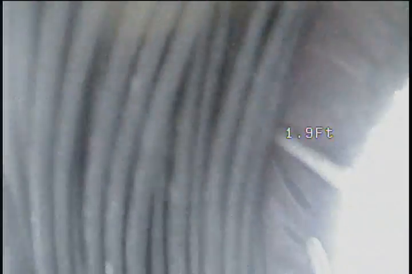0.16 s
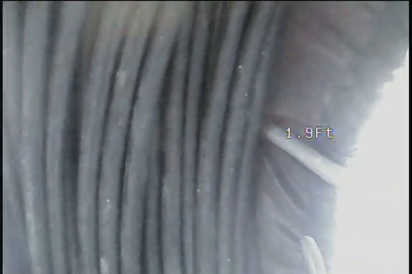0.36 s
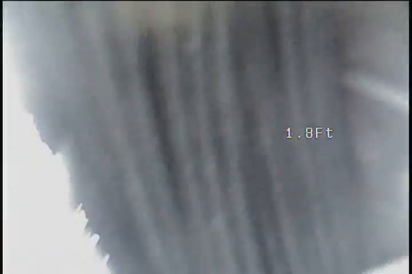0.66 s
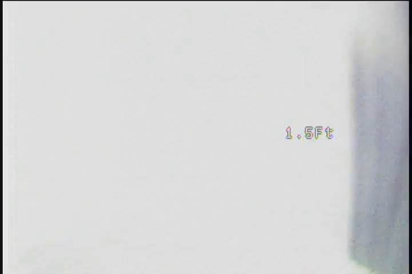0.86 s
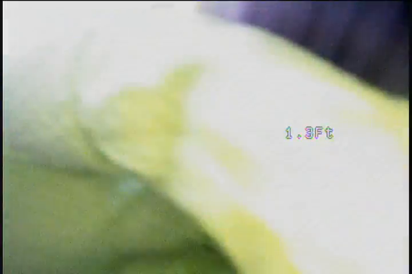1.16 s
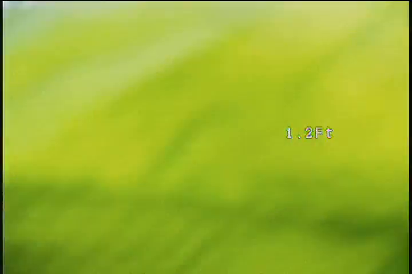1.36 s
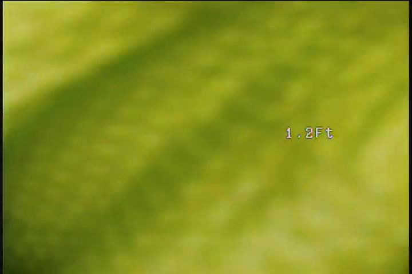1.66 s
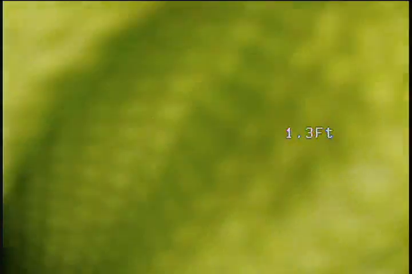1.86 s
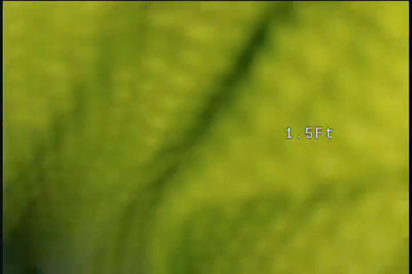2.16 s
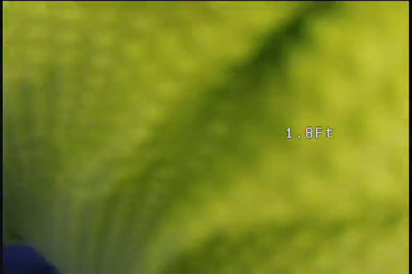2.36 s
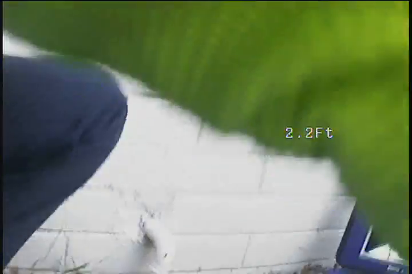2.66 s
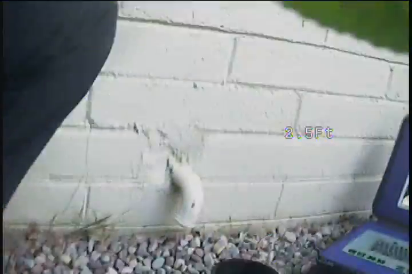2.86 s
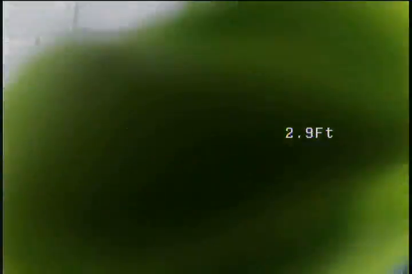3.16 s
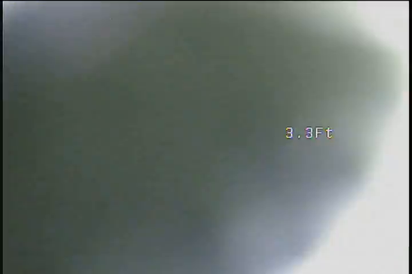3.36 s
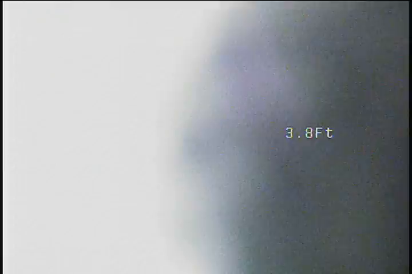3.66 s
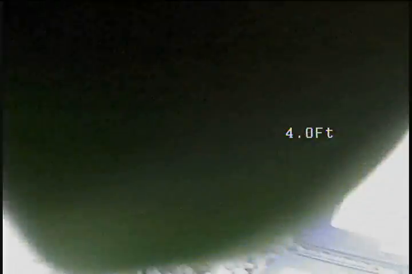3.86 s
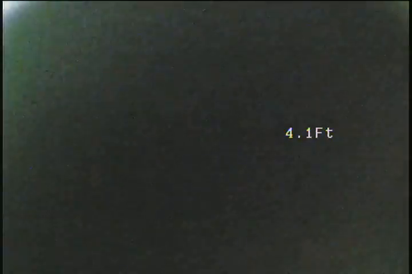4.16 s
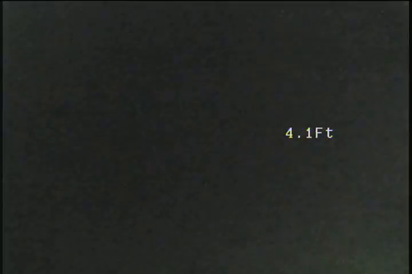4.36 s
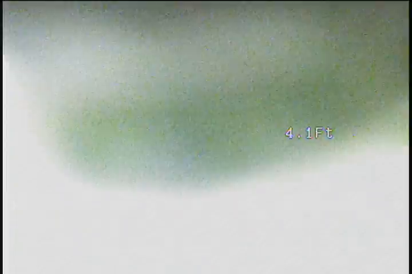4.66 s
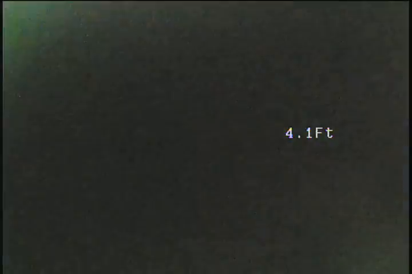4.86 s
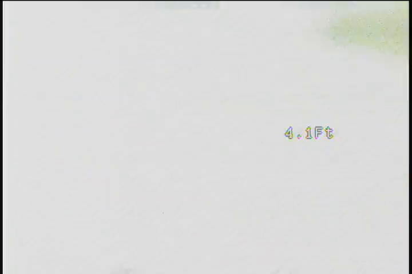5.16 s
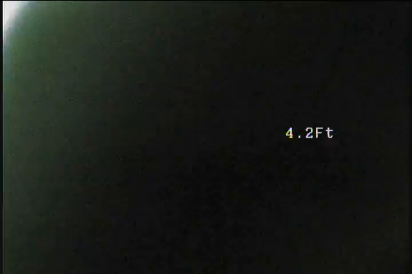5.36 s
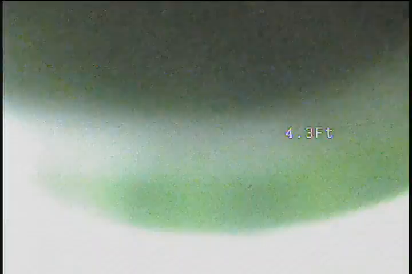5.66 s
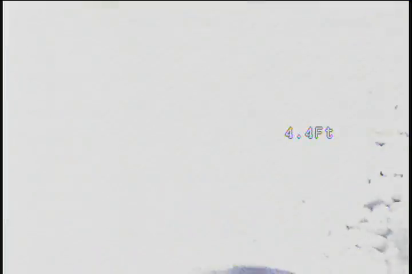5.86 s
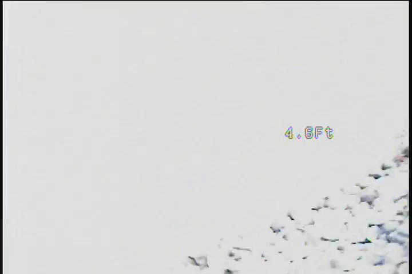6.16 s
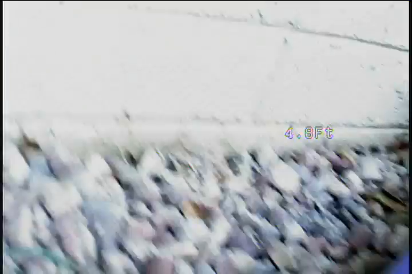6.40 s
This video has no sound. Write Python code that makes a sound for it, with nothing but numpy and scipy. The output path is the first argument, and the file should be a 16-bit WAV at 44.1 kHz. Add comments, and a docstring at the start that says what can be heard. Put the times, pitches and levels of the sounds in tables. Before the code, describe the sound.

A burst of metal clacks opens as cable coils knock a reel frame, one spoke ringing briefly. Isolated clicks follow with long near-quiet gaps, then gritty sliding and quickening rattles build to a loud clank. The sound turns to stony, scratchy rubbing of gloves and gravel along the cable, with crackles and small pebble ticks, fading to light scuffs. Dry, close outdoor pickup with steady low hiss and a barely audible high whine.

```python
"""Coils of a springy push cable knock and drag on a steel reel, outdoors; then gloves and gravel rasp on it.
Reel: noise bursts, clicks and gritty drag noise, heard dry and through the resonant modes of the frame.
Spokes: decaying sines. Rasp: grainy noise strokes, single cracks and short sine notes of pebbles.
Coloured hiss, a faint 15.7 kHz video line whine and an offset from zero lie underneath."""
import sys
import numpy as np
from scipy import signal
from scipy.fft import rfft, irfft, next_fast_len
from scipy.io import wavfile
from scipy.ndimage import uniform_filter1d

SR = 44100
rng = np.random.default_rng(int(sys.argv[2]) if len(sys.argv) > 2 else 0)


def dump(signal):
    """Clip the signal to [-1, 1] and save it as 16-bit WAV at the path in sys.argv[1]."""
    limited = np.clip(np.atleast_2d(signal).T, -1, 1)
    pcm = np.round(limited * 32767).astype(np.int16)
    wavfile.write(sys.argv[1], SR, pcm)


N = 287973
TIME_S = np.arange(N) / SR


def undb(db):
    """dB to gain."""
    return 10 ** (np.asarray(db) / 20)


def unit(x):
    """Scale to rms 1."""
    return x / np.sqrt(np.mean(x ** 2))


def curve(table):
    """Interpolate the columns of a table over time; -120 dB outside it."""
    point_s, *columns = np.transpose(table)
    return [np.interp(TIME_S, point_s, column, -120, -120) for column in columns]


def tint(x, colour):
    """Filter by a (frequency [Hz], gain [dB]) spectrum, interpolated over log frequency."""
    point_hz, gain_db = np.transpose(colour)
    size = next_fast_len(N)
    hz = np.arange(size // 2 + 1) * SR / size + 1  # +1 avoids log 0
    gain = undb(np.interp(np.log(hz), np.log(point_hz), gain_db))
    return irfft(rfft(x, size) * gain, size)[:N]


def wander(rate_hz):
    """Straight ramps between random levels, 1 / rate apart; spread about 1.65."""
    hold = int(SR / rate_hz)
    steps = np.repeat(rng.standard_normal(N // hold + 1), hold)
    return uniform_filter1d(steps, hold)[:N] * 2.02


def fade(start_s, t60_s, rise_s):
    """First sample and power shape of a burst: quick rise, exponential fade, cut at t60."""
    start = int(start_s * SR)
    age_s = np.arange(min(int(t60_s * SR), N - start)) / SR
    amplitude = (1 - np.exp(-age_s / rise_s)) * undb(-60 * age_s / t60_s)
    return start, amplitude ** 2


def grit(rate_hz, spread_db, t60_s, bed):
    """Power, mean 1: random grains of uneven size, each fading, over an even bed."""
    size_db = spread_db * np.minimum(rng.exponential(size=N), 3)
    grains = (rng.random(N) < rate_hz / SR) * undb(size_db) ** 2
    tails = signal.lfilter([1], [1, -undb(-120 / (t60_s * SR))], grains)  # -60 dB in power at t60
    return bed + (1 - bed) * tails / tails.mean()


# bands of contact noise, bass, middle, treble, top: (low edge [Hz], high edge [Hz])
CONTACT_BANDS = [(500, 3400), (3400, 6200), (6200, 9800), (9800, 15500)]


def contact_noise(power, clicks, colour):
    """Dry contact: noise of given power plus clicks, filtered band by band, then coloured."""
    out = 0
    for band_power, band_clicks, (low_hz, high_hz) in zip(power, clicks, CONTACT_BANDS):
        widen = SR / 2 / (high_hz - low_hz)  # makes up for what the band filter removes
        noise = np.sqrt(band_power) * rng.standard_normal(N) * np.sqrt(widen)
        band_pass = signal.butter(3, (low_hz, high_hz), "band", fs=SR, output="sos")
        out = out + signal.sosfilt(band_pass, noise + band_clicks * widen)
    return tint(out, colour)


def gritty(power, rate_hz, spread_db, t60_s, bed):
    """Grain the power per band: some grains reach all bands, others only one."""
    shared = grit(rate_hz, spread_db, t60_s, bed)
    return power * [np.sqrt(shared * grit(rate_hz, spread_db, t60_s, bed)) for _ in CONTACT_BANDS]


def band_levels(middle_db, bass_db, treble_db, top_db, top_slope):
    """dB in the four bands; bass, treble and top are relative, and the top follows the treble."""
    top = middle_db + top_db + top_slope * treble_db
    return np.array([middle_db + bass_db, middle_db, middle_db + treble_db, top])


def steel(middle_db, bass_db, treble_db):
    """Band levels of contact with the frame."""
    return band_levels(middle_db, bass_db, treble_db, top_db=-2.5, top_slope=1.3)


def gravel(middle_db, bass_db, treble_db):
    """Band levels of contact with gloves and gravel."""
    return band_levels(middle_db, bass_db, treble_db, top_db=-6.5, top_slope=0.87)


# amplifier noise spectrum before scaling: (frequency [Hz], relative level [dB per Hz])
HISS_SPECTRUM = [(10, -46), (20, -6), (40, -3.5), (100, -6), (250, -9), (600, -12), (1200, -13),
                 (3000, -13), (6000, -14.5), (10000, -17), (16000, -17)]
HISS_RMS_DB = -55.5


def hiss():
    """Smooth amplifier noise, stronger in the bass."""
    return undb(HISS_RMS_DB) * unit(tint(rng.standard_normal(N), HISS_SPECTRUM))


WHINE_HZ, WHINE_PEAK_DB = 15734, -78


def line_whine():
    """Video line whine: a faint steady high sine."""
    return undb(WHINE_PEAK_DB) * np.sin(2 * np.pi * WHINE_HZ * TIME_S)


# free spoke pings until a coil lands on it: (start [s], damped from [s], pitch [Hz], level [dB], t60 [s])
SPOKE_PINGS = [(.052, .165, 7316, -30, .42), (1.754, 1.8, 7316, -42, .12), (2.518, 2.6, 11724, -52, .3),
               (2.885, 2.97, 11724, -42, .3), (2.915, 3.0, 12402, -44, .3), (2.987, 3.06, 2100, -50, .3)]


def spokes():
    """Pure rings that swell in, decay and are damped off."""
    out = 0
    for start_s, until_s, hz, level_db, t60_s in SPOKE_PINGS:
        age_s = np.clip(TIME_S - start_s, 0, None)
        swell = 1 - np.exp(-age_s / 0.00058)
        damping = np.exp(-np.clip(TIME_S - until_s, 0, None) / 0.0073)
        decay = undb(level_db - 60 * age_s / t60_s)
        out = out + decay * swell * damping * np.sin(2 * np.pi * hz * age_s)
    return out


# hands shifting on the cable: (time [s], middle level [dB])
HAND_LEVELS = [(2.98, -71), (3.02, -54), (3.6, -52.5), (4.05, -61.5), (4.5, -58), (5.0, -56), (5.4, -56.5),
               (6.1, -62.5), (6.53, -59.5)]
HAND_BASS_DB, HAND_TREBLE_DB = -8, -5  # over the middle
# strokes of glove and gravel along the cable:
# (peak [s], hold [s], middle level [dB], bass over middle [dB], treble over middle [dB])
CABLE_STROKES = [(3.097, .03, -52.5, -17, 3), (3.246, 0.017, -55, -12, -1.5), (3.341, 0.076, -52, -0.5, 2),
                 (3.517, 0.064, -45.5, -16, -4), (3.859, 0.0063, -52.5, -3.5, -7),
                 (4.166, 0.086, -44, -4.5, 2.5), (4.49, 0.028, -54.5, -1, -3), (4.757, 0.029, -63, -6, -4),
                 (5.044, .03, -51, 0, 1.5), (5.092, 0.058, -40, -1, -1.5), (5.182, 0.066, -43, -10, 4),
                 (5.56, 0.027, -56.5, -1, -1), (5.6, 0.017, -68, -10, 0), (5.763, 0.1, -58.5, -11, -1.5),
                 (6.06, 0.025, -63, -8, 1.5), (6.22, 0.04, -54.5, -8, -1.5), (6.438, .02, -61, -18, -9)]
STROKE_RISE_DB_PER_S, STROKE_FALL_DB_PER_S = 500, 165


def rubbing():
    """Power per band of the handling and of strokes that swell, hold and die away."""
    power = undb(gravel(curve(HAND_LEVELS)[0], HAND_BASS_DB, HAND_TREBLE_DB)) ** 2
    for peak_s, hold_s, *levels_db in CABLE_STROKES:
        before_s = np.clip(peak_s - TIME_S, 0, None)
        after_s = np.clip(TIME_S - peak_s - hold_s, 0, None)
        drop_db = STROKE_RISE_DB_PER_S * before_s + STROKE_FALL_DB_PER_S * after_s
        power = power + undb(gravel(*levels_db))[:, None] ** 2 * undb(-drop_db) ** 2
    return power


# colour of dry gravel contact: (frequency [Hz], gain [dB])
GRAVEL_COLOUR = [(300, -8), (800, -15), (1500, -8), (2100, 1), (3200, -3), (4500, -2.5), (6800, 1.5),
                 (9300, 0.5), (10500, -5.5), (13000, 3), (15500, -12)]
# single cracks of grit and pebbles: (time [s], middle level [dB], bass over middle [dB],
# treble over middle [dB], snap over burst [dB], pebble pitch [Hz])
GRIT_CRACKS = [(3.0887, -59, -9.0, 11, 8, 4760), (3.108, -51.5, -17, 5.0, 11, 4350),
               (3.1272, -53, -13, 11, 5, 4680), (3.1704, -57, -8, 8, 14, 4380),
               (3.257, -48, 10, 2.5, 6, 1730), (3.267, -42, -8, -8, 11, 4650),
               (3.3069, -49.5, 5, -11, 2, 2170), (3.3258, -55, -8.5, 0.0, 6, 3250),
               (3.3606, -53.5, 13.5, 6, 8, 2420), (3.4157, -61, -11.5, 4.0, 10, 4440),
               (3.5618, -38.5, -0.5, -1, 12, 2790), (3.7589, -50, -12.0, -11.5, 5, 4510),
               (3.851, -46.5, -4, 1, 2, 4260), (4.0779, -51, -8.5, 0.5, 8, 4430),
               (4.1544, -51, -11, 11, -8, 3620), (4.1599, -40.5, -11.5, 10.5, 4, 4440),
               (4.1866, -39, -12, 9, 9, 4420), (4.1932, -38, -17.0, 8, 4, 4500),
               (4.244, -43.5, -19, 5, 11, 4410), (4.255, -47, -17.5, 10, 9, 4640),
               (4.2671, -57, -12.0, 9.5, 6, 4130), (4.3139, -51.5, -13.5, 10, 7, 4560),
               (4.327, -52, -9.0, 6, 7, 4020), (4.4769, -56.0, -5.5, 10, 8, 4400),
               (4.4862, -43, -19, 1.5, 6, 3220), (5.027, -51, 7, 5, 8, 4100),
               (5.058, -43, -1, -4.0, 9, 4060), (5.0757, -47, -9.5, 10, 10, 3800),
               (5.0848, -39, 2, -7.0, 0, 3150), (5.093, -33, -7, 1.0, 9, 4000),
               (5.1063, -35, 0, 8, 6, 4020), (5.1179, -39, -9.5, 8, 4, 4330),
               (5.1354, -31, -3, 4.5, 6.5, 2150), (5.1542, -37.5, 3, 6.0, 7, 3300),
               (5.1779, -51, -4, 7.0, 5, 4630), (5.1895, -39, -8.5, 13, 15.5, 4300),
               (5.2089, -46, 2, 15, 6, 4320), (5.2387, -39.5, -5, 0, 3, 4520),
               (5.2469, -48.5, -2.0, 7.5, 3, 3750), (5.2772, -47.0, -10.5, 9, 4, 4430),
               (5.3427, -52.0, -6.5, 2.0, 6, 4200), (5.4062, -47.5, -11.0, 9.5, 3, 2200),
               (5.4594, -52, -9.5, 4, 9, 4370), (5.5538, -49.5, -3, -1, 5, 3600),
               (5.6206, -52.5, -8, 10, 9, 2430), (5.6398, -52, -19, 10, 13, 4260),
               (5.6649, -57.5, -3.5, 8, 11, 4400), (5.877, -55, -6.0, 9, 3, 3480),
               (6.207, -37.5, -9, -6.0, 0, 4430), (6.36, -54, -10, 5, 6, 4600),
               (6.4278, -47, -20, 0, 2, 4600), (6.4617, -51, -8, 0.5, 1, 4620)]
CRACK_T60_S, PEBBLE_T60_S = 0.031, 0.018
PEBBLE_DB = 5  # note against its band


def rasp():
    """Dense grains of rubbing with louder single cracks, each with the short note of its pebble."""
    power = gritty(rubbing(), rate_hz=500, spread_db=4.7, t60_s=0.013, bed=0.28)
    # slow random level changes per band
    power = power * [undb(1.77 * wander(25)) ** 2 for _ in CONTACT_BANDS]
    # small crackles, sized by the rubbing under them
    crackle_at = rng.random(N) < 70 / SR
    clicks = crackle_at * np.sqrt(power) * undb(0.5 + 3 * rng.standard_normal((4, N)))
    notes = np.zeros(N)
    for start_s, middle_db, bass_db, treble_db, snap_db, hz in GRIT_CRACKS:
        band_db = gravel(middle_db, bass_db, treble_db)
        start, shape = fade(start_s, CRACK_T60_S, rise_s=0.0012)
        shape = shape * (1.26 + 8 * shape ** 4)  # a snap, then a softer crumble
        power[:, start:start + len(shape)] += undb(band_db)[:, None] ** 2 * shape
        # the click comes about 1 ms after the burst starts
        clicks[:, start + int(.0011 * SR)] += undb(band_db + snap_db)
        start, ring = fade(start_s, PEBBLE_T60_S, rise_s=0.00056)
        note = np.sqrt(ring) * np.sin(2 * np.pi * hz * np.arange(len(ring)) / SR)
        note_db = band_db[int(hz > CONTACT_BANDS[0][1])] + PEBBLE_DB  # bass or middle band
        notes[start:start + len(ring)] += undb(note_db) * note
    return contact_noise(power, clicks, GRAVEL_COLOUR) + notes


# coils drag over the frame, one list per pull: (time [s], middle level [dB], treble over middle [dB])
DRAG_PULLS = [
    [(0.0, -41, -8), (0.038, -65, -9), (0.06, -47, -2), (0.15, -67, 0), (0.24, -49, -16), (0.27, -59.5, 2),
     (0.42, -58.5, -0.5), (0.51, -53.5, -2), (0.56, -82, 1)],
    [(1.2, -69, -3), (1.8, -72, -4), (1.956, -54.5, 3), (2.0, -64.5, -1), (2.22, -56.5, -2.5),
     (2.284, -56.5, -4), (2.342, -43.5, -4.5), (2.42, -56.5, -3), (2.48, -61, 0), (2.5, -53, 3.5),
     (2.62, -49, 3.5), (2.67, -59.5, 3.5), (2.8, -56, 4), (2.815, -45.5, 6.5), (2.904, -39.5, 6),
     (2.956, -46.5, -9), (3.06, -73, 1)],
]
DRAG_BASS_DB = -7.5  # over the middle
# coils knock the frame: (time [s], middle level [dB], bass over middle [dB], treble over middle [dB],
# favoured low mode [Hz], favoured high mode [Hz], t60 [s])
COIL_KNOCKS = [(0.0484, -25, -8, -6.5, 1340, 5700, 0.08), (0.0526, -30, -10, -6, 1340, 7300, 0.032),
               (0.094, -34, -7, -11, 3260, 7310, 0.05), (0.1539, -31.5, -9.5, -4.5, 1430, 5070, 0.05),
               (0.157, -32, -4.5, -6, 1440, 5060, 0.052), (0.178, -33.5, -14, -11, 1360, 4600, 0.05),
               (0.1961, -31, -4, -3.5, 1480, 4900, 0.055), (0.211, -26, -17, -10, 1430, 5400, 0.04),
               (0.2189, -36, -12.5, -11.0, 2170, 4250, 0.05), (0.2324, -34.5, -9, -19, 1460, 4430, 0.05),
               (0.241, -40.5, -4, -2, 1570, 4320, 0.044), (0.7465, -56, -2.0, -1.5, 3300, 7300, 0.05),
               (0.7606, -56, -11.0, 6, 3500, 4230, 0.03), (0.798, -33, -9, -6, 2310, 4130, 0.047),
               (0.9304, -41, -10, -9, 3140, 5510, 0.079), (0.942, -41.5, -9, -8, 3130, 5660, 0.05),
               (1.045, -45, -7.5, -9, 2580, 5240, 0.046), (1.052, -46, -6, 2, 3170, 5100, 0.05),
               (1.0745, -53, -5, -1.0, 1880, 3890, 0.05), (1.316, -49, -8.0, -8, 3380, 4870, 0.056),
               (1.448, -48, -3, -11, 1620, 4440, 0.044), (1.549, -51, -2, -6, 1540, 4430, 0.047),
               (1.6161, -49.5, -7.5, -1, 3600, 4740, 0.035), (1.751, -39.5, -10, -20, 3130, 4240, 0.046),
               (1.9085, -45, -13, -1.5, 3340, 6940, 0.056), (1.9157, -46.5, -15.0, 0, 3350, 6930, 0.05),
               (1.944, -43, -12, -1, 2920, 5800, 0.055), (1.97, -46.5, -5, -11, 2890, 5080, 0.058),
               (2.105, -46, -9, -3.0, 1530, 5220, 0.05), (2.157, -48.5, -2.5, -4.5, 2870, 5590, 0.05),
               (2.2078, -44.5, -14.5, -1, 2890, 5590, 0.05), (2.3135, -44.5, -7, -2, 2850, 6970, 0.074),
               (2.342, -46, -8, -11, 3330, 5350, 0.07), (2.4876, -46, -8, 3.5, 2910, 6910, 0.067),
               (2.518, -45.5, -11, 2.5, 3020, 6850, 0.08), (2.562, -52, -12, 9, 2680, 6720, 0.05),
               (2.599, -43.5, -9.5, -7, 2910, 6920, 0.05), (2.6287, -41, -11, 0.5, 1730, 6910, 0.05),
               (2.681, -49, -5.5, 10, 2880, 6960, 0.041), (2.692, -49, -8.0, 11, 2640, 6950, 0.046),
               (2.725, -46.5, -5, 6.5, 2800, 7130, 0.044), (2.7376, -46.0, -9.5, 7, 2900, 7010, 0.05),
               (2.766, -42.5, -5, 10.5, 2900, 6100, 0.052), (2.7789, -45, -8.5, 6, 2740, 6750, 0.05),
               (2.812, -42.5, -3, 8, 2550, 5290, 0.05), (2.8205, -35.5, -9, -4.0, 2870, 5170, 0.1),
               (2.8944, -28.5, -6, -7, 2600, 4850, 0.053), (2.9153, -24.5, -9, -3, 2560, 5160, 0.056),
               (2.9196, -26.5, -11, 4.5, 3360, 5000, 0.052), (2.9833, -40.5, -3, -3, 2080, 4900, 0.044)]
RATTLE_DB, RATTLE_T60_S = -14.5, 0.25  # against its knock


def sliding():
    """Power per band of the drag and of the coils' rattle after each knock."""
    power = 0
    for pull in DRAG_PULLS:
        middle_db, treble_db = curve(pull)
        power = power + undb(steel(middle_db, DRAG_BASS_DB, treble_db)) ** 2
    for start_s, middle_db, _, treble_db, *_ in COIL_KNOCKS:
        start, shape = fade(start_s, RATTLE_T60_S, rise_s=0.0051)
        rattle_db = steel(middle_db, DRAG_BASS_DB, treble_db) + RATTLE_DB
        power[:, start:start + len(shape)] += undb(rattle_db)[:, None] ** 2 * shape
    return power


# frame modes: (frequency [Hz], level when knocked [dB], extra level when dragged [dB], t60 [s])
FRAME_MODES = [(1192, -2, -16, 0.1), (1334, -3, -15, 0.17), (1433, 0.5, -4, 0.064),
               (1830, 2.5, -2.5, 0.063), (2190, 1, -10, 0.2), (2598, 1.5, -1.5, 0.049),
               (2901, 1, 2.5, 0.041), (3180, -6.5, 10.5, 0.045), (3740, 0.5, 1.5, 0.029),
               (3950, -12.5, -6, 0.056), (4160, -8, 11, 0.11), (4385, 4.5, -15, 0.045),
               (4880, 1, -14, 0.041), (5110, -4.5, 4, 0.13), (5430, -1, 1, 0.039), (5650, 0, -6.5, 0.045),
               (5650, -1.5, -0.5, 0.065), (5840, -17, 4, .05), (6800, -0.5, 2.5, 0.03),
               (7020, 0, 5.5, .025), (7330, 0, 0, 0.012), (7840, -5.5, 0, 0.03), (8880, 0.5, -11, 0.034),
               (9100, -9, -6, 0.059), (10100, -19, 2.5, 0.086), (10000, -22, -6, 0.065),
               (12000, -4, -3, .035), (13000, 2, -6, 0.024), (15000, -13, 4, .03)]


def frame_ring(shake):
    """Two-pole resonators, one per frame mode, driven by noise of the given power."""
    ring = 0
    for (hz, level_db, _, t60_s), power in zip(FRAME_MODES, shake):
        radius, angle = undb(-60 / (t60_s * SR)), 2 * np.pi * hz / SR
        scale = np.sqrt(1 - radius * radius) * np.sin(angle)  # same power whatever the decay
        push = np.sqrt(power) * rng.standard_normal(N)
        mode = signal.lfilter([1], [1, -2 * radius * np.cos(angle), radius * radius], push)
        ring = ring + undb(level_db) * scale * mode
    return ring


# colour of dry steel contact: (frequency [Hz], gain [dB])
STEEL_COLOUR = [(500, -28), (900, -3.5), (1400, -3), (2300, 1.5), (3200, -5.5), (4200, -1), (5600, 2),
                (7000, -3), (9300, -1), (11000, -7), (15000, -8), (15900, -11)]
# how firmly sliding coils grip the frame and ring it: (time [s], level [dB])
COIL_GRIP = [(0, -5), (.25, -10), (.3, -9.5), (1.8, -0.5), (2.3, -2), (3.1, -5)]
KNOCK_CLICK_DB = -15  # against the burst
DRY_BASS_DB = -4  # the bass of a knock sounds mostly through the frame
RING_DB = -4.5  # frame ring against dry contact
NEAR_LOW_DB, NEAR_HIGH_DB, FAR_DB = 14.5, 8.5, -7  # lift of favoured modes; shift of all modes
NEAR_WIDTH = .13  # in log frequency


def reel():
    """Knocks and drag shake the frame; each knock favours the modes near where it lands."""
    power = gritty(sliding(), rate_hz=320, spread_db=3.0, t60_s=0.033, bed=0.15)
    clicks = np.zeros((4, N))
    mode_hz = np.array(FRAME_MODES)[:, 0]
    mode_band = np.searchsorted(np.array(CONTACT_BANDS)[1:, 0], mode_hz)
    grip_db = curve(COIL_GRIP)[0]
    # the level of each dragged mode wanders at random
    reach = [undb(drag_db + grip_db + 2.8 * wander(9.5)) ** 2 for _, _, drag_db, _ in FRAME_MODES]
    shake = power[mode_band] * reach
    dry_gain = undb([DRY_BASS_DB, 0, 0, 0])
    for start_s, middle_db, bass_db, treble_db, low_hz, high_hz, t60_s in COIL_KNOCKS:
        start, shape = fade(start_s, t60_s, rise_s=0.00036)
        end = start + len(shape)
        band_db = steel(middle_db, bass_db, treble_db)
        burst = undb(band_db) ** 2
        lift_db = FAR_DB
        for near_hz, near_db in ((low_hz, NEAR_LOW_DB), (high_hz, NEAR_HIGH_DB)):
            lift_db = lift_db + near_db * np.exp(-(np.log(mode_hz / near_hz) / NEAR_WIDTH) ** 2)
        power[:, start:end] += (burst * dry_gain ** 2)[:, None] * shape
        shake[:, start:end] += (burst[mode_band] * undb(lift_db) ** 2)[:, None] * shape
        clicks[:, start + int(.001 * SR)] += undb(band_db + KNOCK_CLICK_DB)
    return contact_noise(power, clicks, STEEL_COLOUR) + undb(RING_DB) * frame_ring(shake)


def scene():
    """Sum hiss, whine, spokes, rasp and reel into one channel."""
    return (hiss() + line_whine() + spokes() + rasp() + reel())[None]


def record(dry):
    """Shift the signal a little below zero, then cut the top steeply."""
    offset, top_hz = -.0022, 15780
    low_pass = signal.ellip(10, .2, 70, top_hz, fs=SR, output="sos")  # ripple, stopband [dB]
    return signal.sosfilt(low_pass, dry + offset)


dry = scene()
out = record(dry)
dump(out)
```